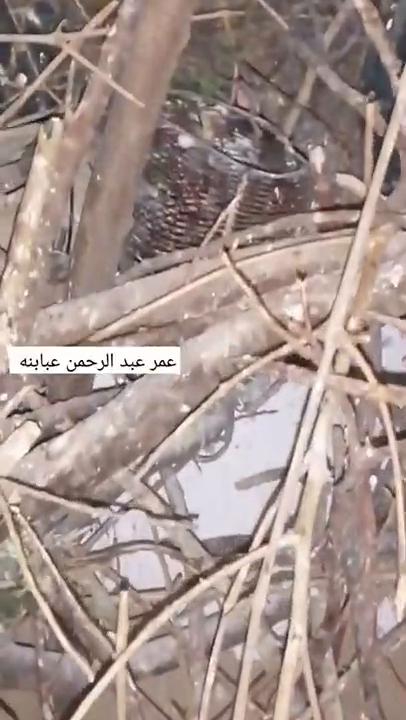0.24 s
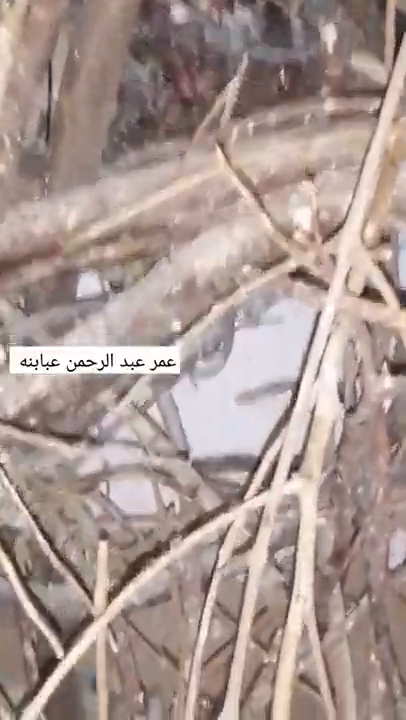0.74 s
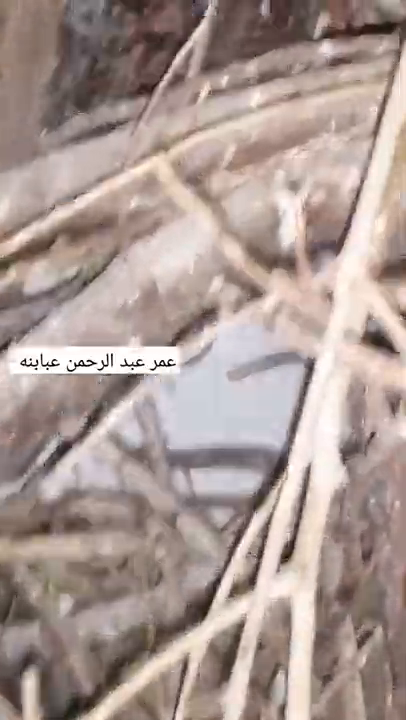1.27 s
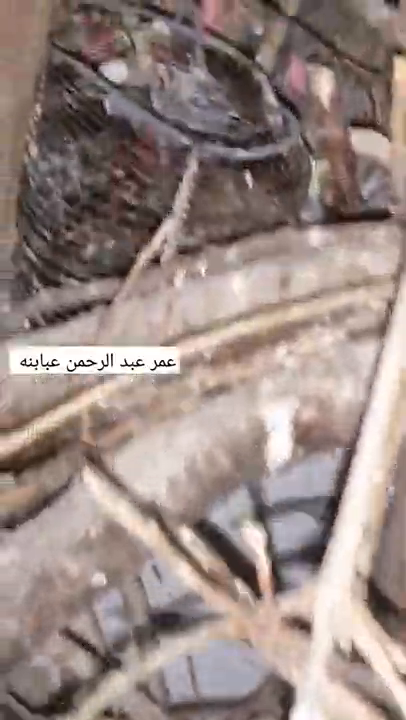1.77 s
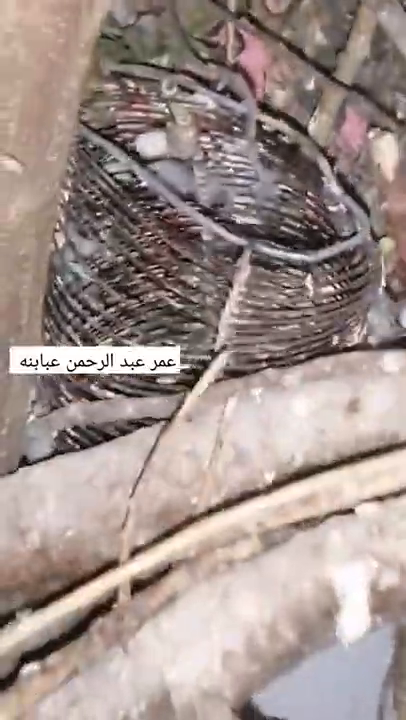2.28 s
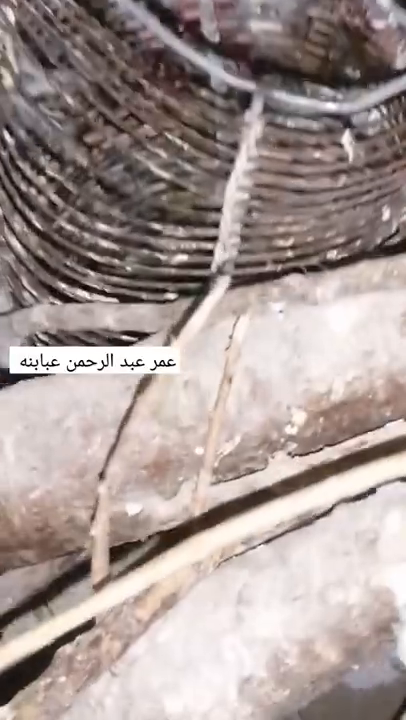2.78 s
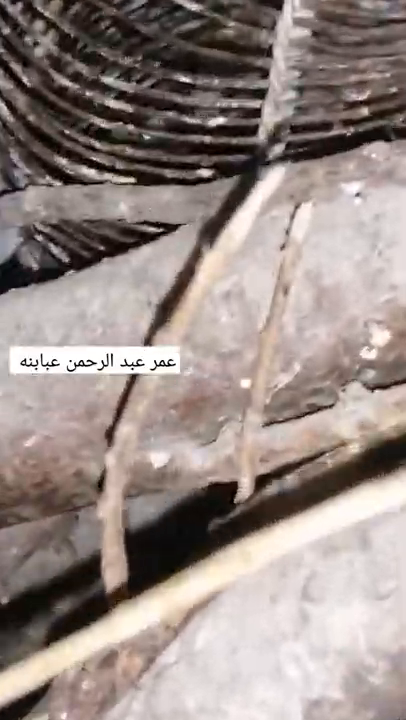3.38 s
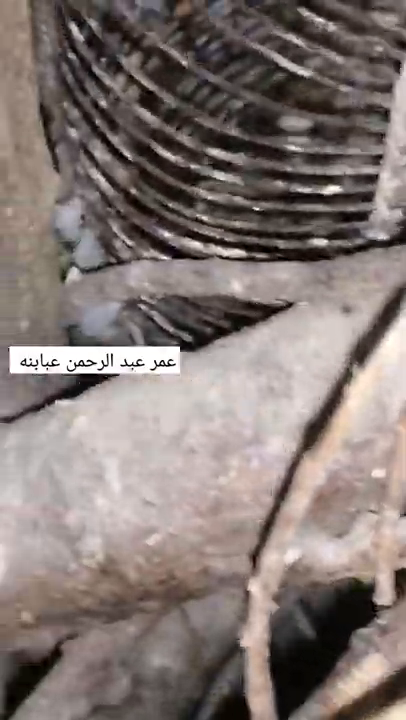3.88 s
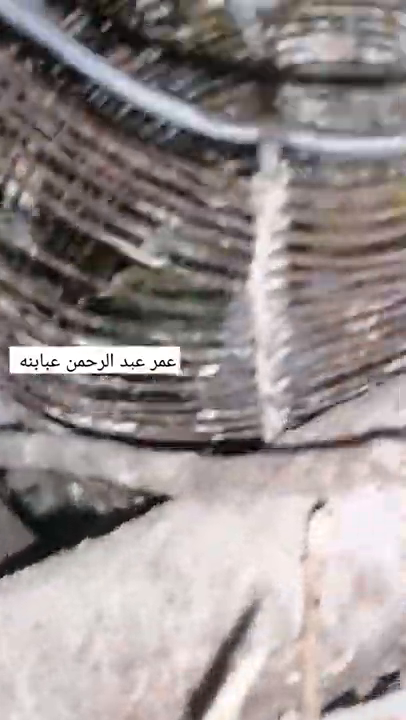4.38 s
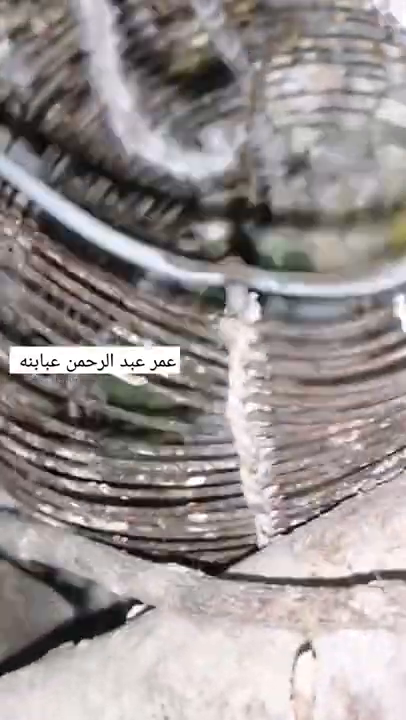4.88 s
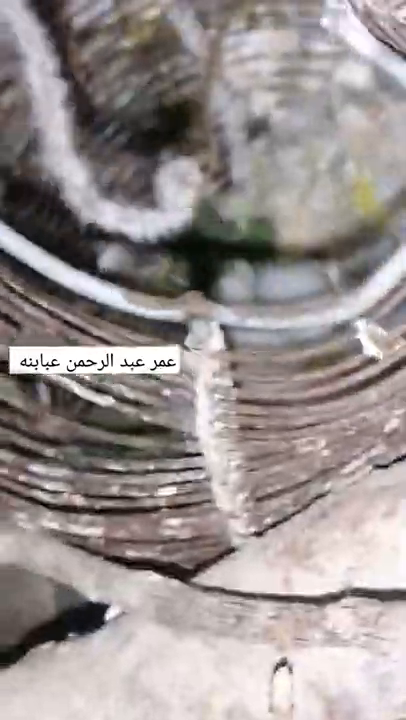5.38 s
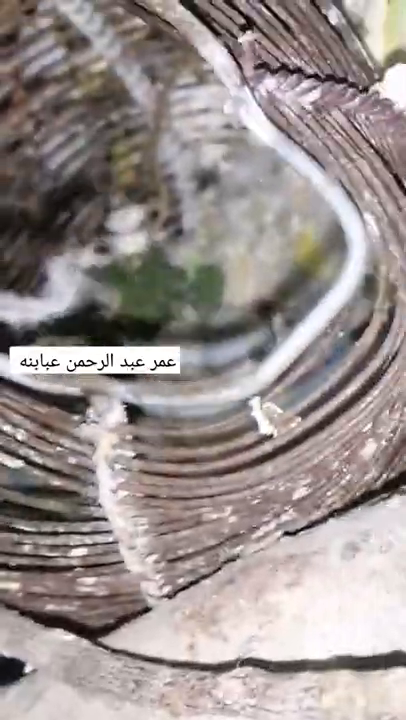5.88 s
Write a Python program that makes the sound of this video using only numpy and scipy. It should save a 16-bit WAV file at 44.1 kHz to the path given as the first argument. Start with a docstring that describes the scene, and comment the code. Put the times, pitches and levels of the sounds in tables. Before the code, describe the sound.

Zebra finches call in a small, hard-walled aviary. Near birds give harsh, buzzy rasps, quick arched squeaks and one clear double peep; birds behind chirp with sliding warbles over dense nasal chatter. A faint hum and distant engine rumble swell and fade under steady hiss. A handheld phone picks it up, brighter on the left and dull on the right, with two soft bumps.

```python
"""A tiny chirp and then harsh rasps come first: zebra finches in a small, hard-walled aviary, over a low rumble.
Near birds rasp (uneven pulses and rushing air through a beak), squeak (arched notes) and peep (clear whistles).
Birds further back chirp with sliding, warbling notes, and a flock of short nasal calls chatters behind them.
Hum, distant engine rumble, low noise and a drone swell and fade under a steady hiss; a hand bumps the phone twice.
The right microphone is shaded from the birds and hears them dull."""
import sys
import numpy as np
from scipy import signal
from scipy.fft import rfft, irfft, next_fast_len
from scipy.io import wavfile

SR = 44100
rng = np.random.default_rng(int(sys.argv[2]) if len(sys.argv) > 2 else 0)


def persist_wave(psi):
    """Save psi, clipped to +-1, as 16-bit WAV."""
    counts = np.round(np.clip(psi, -1, 1) * 32767).astype(np.int16)
    wavfile.write(sys.argv[1], SR, np.atleast_2d(counts).T)


N = 270774  # samples, about 6.1 s

# All levels in these tables are relative: each layer is balanced again when it is mixed.
# Chirps from further back: (start [s], length [s], level [dB], first pitch [Hz], last pitch [Hz])
FAR_CHIRPS = [(0, 0.0069, -31.5, 3650, 3600), (0.549, 0.1, -25.5, 3740, 3440),
              (0.789, 0.068, -31, 3480, 3650), (0.918, 0.017, -26.5, 3510, 3720),
              (.985, 0.059, -31, 3976, 3400), (1.183, 0.11, -34.5, 3300, 3635),
              (1.508, 0.045, -30, 3460, 2580), (1.575, 0.091, -29.5, 3215, 3880),
              (1.725, 0.13, -30, 3303, 3600), (2.043, 0.053, -34.5, 3280, 3150),
              (2.104, .09, -31.5, 3723, 2995), (2.439, 0.078, -29.5, 2990, 2770),
              (2.706, 0.046, -30, 4100, 4280), (2.75, 0.095, -31, 3280, 3490),
              (2.943, 0.067, -31, 3710, 3870), (3.074, 0.036, -29.5, 4140, 4110),
              (3.107, 0.073, -27, 2882, 2870), (3.143, 0.047, -25.5, 3810, 4050),
              (3.312, 0.084, -30, 3810, 3380), (3.495, 0.043, -32, 3840, 2870),
              (3.602, 0.071, -30, 3088, 3190), (3.688, 0.09, -30, 3160, 3010),
              (4.245, 0.0702, -25.5, 3410, 3100), (4.442, 0.044, -25.5, 3194, 3200),
              (4.483, 0.096, -26, 3730, 4110), (4.56, 0.045, -28, 3210, 3300),
              (5.119, 0.052, -35.5, 3760, 3430), (5.188, 0.076, -34, 3440, 2750),
              (5.385, .03, -32.5, 2930, 2840), (5.671, 0.035, -28, 3543, 3200),
              (5.7, .055, -25, 2913, 3470), (5.825, 0.13, -26.5, 3370, 3150),
              (6.042, .086, -28.5, 3550, 3400)]
# Tone of the distant flock: (frequency [Hz], gain [dB])
FLOCK_TONE = [(700, -7.5), (1100, -13.5), (1700, -6), (3200, 2.5), (4500, -6.5), (6500, -14), (9300, -7.5),
              (11500, -16), (15000, -18)]
# Loudness of the chatter over time: (time [s], level [dB])
CHATTER_LEVEL = [(0, 0), (.7, 3.5), (1.5, -3.5), (1.85, 2), (2.3, -2), (3.1, 4.5), (3.5, 1.5), (4.05, -0.5),
                 (4.5, 1.5), (5.3, -5), (6.14, 2)]
# Loudness of the hum and the distant engine rumble: (time [s], level [dB])
HUM_AND_ENGINE_LEVEL = [(0, -56), (.9, -53), (2.07, -49.5), (2.29, -62), (3.6, -55), (3.81, -43),
                        (4.14, -50.5), (4.62, -46.5), (5.2, -50.5), (6.14, -51)]
# Loudness of the low room noise: (time [s], level [dB])
ROOM_NOISE_LEVEL = [(0, -58.5), (1.1, -58.5), (2.05, -51.5), (3.1, -50.5), (3.6, -60), (4.45, -56),
                    (4.8, -48), (6.14, -54.5)]
# Loudness of a faint drone: (time [s], level [dB])
FAINT_DRONE_LEVEL = [(0, -65), (1.15, -65), (1.23, -50), (1.5, -66.5), (4.4, -80), (5.3, -49), (6.14, -57)]
# Tone of the distant engine rumble: (frequency [Hz], gain [dB])
ENGINE_TONE = [(20, -23), (32, -2), (42, 7), (62, 15.5), (76, -8), (100, -26), (200, -20), (1000, -48)]
# Tone of the low room noise: (frequency [Hz], gain [dB])
ROOM_NOISE_TONE = [(40, -13), (70, -22), (86, 3.5), (102, -8.5), (120, 2), (165, -4), (260, -11.5),
                   (400, -17), (700, -23.5), (2000, -41), (8000, -45)]
# Tone of the hiss: (frequency [Hz], gain [dB])
HISS_TONE = [(200, -22), (700, -9.5), (1400, 1), (3000, 9), (4500, 3), (7000, -3), (9500, 2), (11500, -15),
             (15000, -31)]
# Open-beak rasps: (start [s], length [s], level [dB], brightness [dB per octave], mouth resonance [Hz])
OPEN_RASPS = [(0.048, 0.094, -30, 3.5, 4440), (0.172, 0.15, -27, 4.5, 5800), (0.318, 0.28, -29, 5.5, 5800),
              (.433, 0.11, -18.5, 7.5, 6860), (0.654, 0.098, -18, 4.5, 4800), (.899, 0.62, -37, -3, 5200),
              (1.077, 0.17, -27, 5.5, 6000), (1.148, 0.12, -29, 3.5, 6540), (1.257, 0.11, -20, 4.5, 5350),
              (1.708, 0.23, -36.5, 5.5, 5430), (2.034, 0.034, -25.5, 4, 5260), (2.419, 0.026, -24, 1, 7200),
              (2.425, 0.094, -20, 3, 4900), (2.91, 0.39, -31, 2, 3500), (3.226, 0.15, -21, 4, 5450),
              (3.5, .053, -38.5, 3, 5300), (3.868, 0.057, -39.5, -1, 5900), (4.062, 0.034, -30, 4, 6150),
              (4.161, 0.041, -23.5, 3.5, 4570), (4.309, 0.081, -22.5, -1, 6140),
              (4.42, 0.092, -22.5, 6, 7400), (4.537, .11, -20, 5, 5950), (4.636, 0.14, -21, 5, 6300),
              (5.258, 0.017, -34.5, 9, 10000), (5.5, 0.23, -32.5, 0, 3700), (5.674, 0.29, -37.5, 1.5, 5350),
              (5.88, 0.06, -23.5, 4, 7530), (5.974, .13, -18.5, 5, 5700), (6.102, 0.078, -25, -2, 4400)]
# Nasal calls with the beak half shut: (start [s], level [dB], hollowness [0-1])
HALF_SHUT_CALLS = [(2.578, -24, 0.3), (4.704, -22, 0.8), (4.83, -18.5, 0.62), (4.935, -20.5, 0.63)]
# Throat with the beak wide open: (frequency [Hz], gain [dB])
OPEN_BEAK_TONE = [(500, -51), (1100, -23), (2000, -8.5), (2900, 5.5), (5500, 3), (7700, 1), (9400, 4),
                  (10500, -5), (12000, -15.5), (15000, -23.5)]
# Windpipe resonances with the beak nearly shut: (centre [Hz], half the filter width [Hz], gain [dB])
WINDPIPE_RESONANCES = [(4180, 840, 15), (9380, 630, 13), (13350, 890, 3.5)]
# Squeaks: (start [s], length [s], level [dB], first pitch [Hz], last pitch [Hz],
#           roughness [0-1], upper harmonics [dB])
SQUEAK_NOTES = [(0.204, 0.033, -28.5, 2910, 3020, 0.58, 1.5), (0.631, 0.042, -20.5, 4620, 5410, 0.45, -5),
                (0.641, 0.038, -28.5, 6140, 6300, 0.4, -10), (.667, .061, -16.5, 5350, 4660, .73, 2),
                (0.657, 0.07, -19, 3457, 3590, .32, -7), (1.732, 0.067, -29.5, 2720, 2734, 0.36, -7.5),
                (2, 0.0235, -40, 3790, 4580, 0.14, -11), (2.778, 0.031, -15.5, 4230, 4880, 0.5, -9),
                (2.786, 0.0633, -19, 2922, 3080, 0.35, -4.5), (2.926, 0.038, -35, 3270, 3320, 0, 2),
                (5.435, 0.034, -22, 4760, 5030, 0.63, -6), (5.45, .064, -16, 3282, 3170, 0.28, -24),
                (5.497, 0.048, -28, 4514, 4100, 0.25, -8)]
# How the throat favours some of a squeak's harmonics: (frequency [Hz], gain [dB])
SQUEAK_THROAT_TONE = [(2900, -11.5), (3400, -28), (4400, -3.5), (5200, -4.5), (6400, -0.5), (7500, -6),
                      (9100, 1.5), (10000, -8), (13500, -6.5), (15500, -30)]
# Clear peeps from a near bird: (start [s], length [s], level [dB])
CLEAR_PEEPS = [(1.364, 0.036, -21.5), (1.408, 0.027, -20)]
# Bumps on the phone: (time [s], thump level [dB], tick level before its filter [dB])
PHONE_BUMPS = [(3.206, -31.5, -3.5), (5.511, -30, -40)]
# Shading of the right microphone: (frequency [Hz], gain [dB])
RIGHT_SHADE = [(200, 4), (700, -2.5), (1300, -4), (2400, -7.5), (4400, -18), (6400, -18.5), (8500, -32.5),
               (11000, -29), (14500, -18.5)]

ROOM_T60_S = 0.46  # time for the lower part of the echo to fall by 60 dB
CUTOFF_HZ = 15600
HUM_HZ, HUM_WAVER_HZ = 59, 3.88
# A harsh call swells for a share of its length beyond CLUCK_S: at least ONSET_S,
# and at most SWELL_S or nine tenths of the call
CLUCK_S, ONSET_S, SWELL_S, SWELL_SHARE = 0.021, 0.003, 0.041, 0.56
NASAL_S = 0.073
SQUEAK_ARCH = 0.0181  # the middle lies this share above the average of both ends
PEEP_HZ, PEEP_FALL = 3364, 0.012  # first pitch, and the share by which it falls


def from_db(db):
    """Turn decibels into a plain multiplier."""
    return 10 ** (np.asarray(db) / 20)


def rms_one(x):
    """Scale a sound to an average (RMS) strength of 1."""
    return x / np.sqrt(np.mean(x ** 2) + 1e-20)


def level_over_time(curve):
    """Join (time, dB) points with straight lines and turn them into multipliers."""
    return from_db(np.interp(np.arange(N) / SR, *np.transpose(curve)))


def add(track, start_s, sound):
    """Mix a sound into a track, cut off at the track's end."""
    at = int(np.clip(start_s * SR, 0, N - 1))
    track[at:at + len(sound)] += sound[:N - at]


def coloured(x, tone, tilt_db=0):
    """Filter by a (Hz, dB) curve; the tilt, in dB per octave, acts above the curve's first point."""
    size = next_fast_len(x.shape[-1] + 512)
    octave = np.log2(np.arange(size // 2 + 1) * SR / size + 1)
    hz, db = np.transpose(tone)
    octaves_above = np.maximum(octave - np.log2(hz[0]), 0)
    gain_db = np.interp(octave, np.log2(hz), db) + tilt_db * octaves_above
    return irfft(rfft(x, size) * from_db(gain_db), size)[..., :x.shape[-1]]


def wobble(size, rate):
    """Wander at random between new values drawn `rate` times a second, with a spread near 1."""
    knots = np.arange(size) * rate / SR
    return np.interp(knots, np.arange(size), rng.standard_normal(size))


def resonate(x, hz, width_hz):
    """Ring at one frequency, with gain 1 at the peak."""
    r = np.exp(-np.pi * width_hz / SR)
    feed = np.array([1, 0, -1]) * (1 - r * r) / 2
    return signal.lfilter(feed, [1, -2 * r * np.cos(2 * np.pi * hz / SR), r * r], x)


def low_pair(side_db):
    """White noise partly shared by both microphones; side_db sets the part that differs."""
    mid, side = rng.standard_normal((2, N))
    return mid + from_db(side_db) * side * [[1], [-1]]


def room(x, wet_db, damping, right_direct=0.51):
    """Direct sound and a dense echo tail, different at each microphone; the treble dies sooner."""
    t = np.arange(SR) / SR
    low_filter = signal.butter(2, 6000, "low", fs=SR, output="sos")
    high_filter = signal.butter(2, 6000, "high", fs=SR, output="sos")
    low = signal.sosfilt(low_filter, rng.standard_normal((2, SR)))
    high = signal.sosfilt(high_filter, rng.standard_normal((2, SR)))
    tail = low * from_db(-60 * t / ROOM_T60_S) + high * from_db(-60 * t * damping / ROOM_T60_S)
    response = from_db(wet_db) * tail / np.sqrt(np.sum(tail ** 2, axis=1, keepdims=True))
    response[:, 0] += [1, right_direct]
    heard = signal.fftconvolve(x[None], response, axes=1)[:, :N]
    return heard / np.sqrt(1 + from_db(wet_db) ** 2)  # more echo does not make it louder overall


def syrinx(length, pitches, rough, harmonics_db, jitter, jitter_rate, warble, warble_rate):
    """A gliding note from a bird's voice organ; roughness shakes its pitch and makes its strength flutter."""
    size = int(max(length, 0.005) * SR)
    progress = np.linspace(0, 1, size)
    glide = np.polyfit(np.linspace(0, 1, len(pitches)), pitches, len(pitches) - 1)
    hz = np.polyval(glide, progress)
    unrest = jitter * wobble(size, jitter_rate) + warble * wobble(size, warble_rate)
    phase = 2 * np.pi * np.cumsum(hz * (1 + rough * unrest)) / SR
    tone = sum(from_db(db) * np.sin(k * phase)
               for k, db in enumerate(harmonics_db, 1) if k * max(pitches) < SR / 2)
    flutter = rms_one(1 + np.tanh(2 * rough * wobble(size, jitter_rate)))
    return np.sqrt(2) * tone * signal.windows.tukey(size, 0.5) * flutter


def chirp(length, first_hz, last_hz, rough, second_db=-17, third_db=-22):
    """A nearly pure note that slides and warbles, with two weaker harmonics."""
    return syrinx(length, [first_hz, last_hz], rough, [0, second_db, third_db],
                  jitter=0.057, jitter_rate=800, warble=0.0777, warble_rate=160)


def chirps(rough_per_s=6.84):
    """The louder birds on the back perches; the longer a chirp lasts, the more it warbles."""
    out = np.zeros(N)
    for start, length, level_db, first, last in FAR_CHIRPS:
        add(out, start, from_db(level_db) * chirp(length, first, last, rough_per_s * length))
    return out


def rumble(hum_db=-4, second_db=-10, third_db=-10, engine_db=-3,
           drone_hz=390, drone_width_hz=60, drone_db=-2):
    """A wavering hum with harmonics, and filtered noise for the engine, the room and a faint drone."""
    phase = 2 * np.pi * np.cumsum(HUM_HZ + HUM_WAVER_HZ * wobble(N, 12)) / SR
    hum = rms_one(sum(from_db(db) * np.sin(k * phase)
                      for k, db in enumerate([0, second_db, third_db], 1)))
    engine = rms_one(coloured(low_pair(-13), ENGINE_TONE))
    room_noise = rms_one(coloured(low_pair(-11), ROOM_NOISE_TONE))
    drone = rms_one(resonate(low_pair(-1.1), drone_hz, drone_width_hz))
    deep = from_db(hum_db) * hum + from_db(engine_db) * engine
    return (level_over_time(HUM_AND_ENGINE_LEVEL) * deep
            + level_over_time(ROOM_NOISE_LEVEL) * room_noise
            + level_over_time(FAINT_DRONE_LEVEL) * from_db(drone_db) * drone)


def hiss(level_db=-44):
    """Steady filtered noise, separate at each microphone."""
    return from_db(level_db) * rms_one(coloured(rng.standard_normal((2, N)), HISS_TONE))


def flock(count=170, low_hz=900, high_hz=2200, glide=0.25, spread_db=7, level_db=-41):
    """Many short nasal calls, rich in harmonics, run together on the far perches."""
    out = np.zeros(N)
    slot_s = N / SR / count  # one call starts at random in each slot
    for k, (when, pitch, slide, loud) in enumerate(rng.random((count, 4))):
        hz = low_hz + pitch * (high_hz - low_hz)
        last_hz = hz * (1 + glide * (2 * slide - 1))
        note = syrinx(0.04, [hz, last_hz], 0.383, np.zeros(10),
                      jitter=0.075, jitter_rate=900, warble=0.0799, warble_rate=101.8)
        add(out, (k + when) * slot_s, from_db(spread_db * loud) * note)
    return from_db(level_db) * rms_one(coloured(out, FLOCK_TONE))


def harsh_call(length, bright_db, mouth_hz, hollow=0, pulse_hz=800, jitter=0.03, slide=0.12, air=0.95,
               flutter_db=5.0, edge_db=-15, mouth_gain=0.77, mouth_width_hz=900):
    """Uneven voice pulses and rushing air, shaped by the open beak or ringing in the windpipe."""
    size = int(length * SR)
    unrest = jitter * wobble(size, 500) + slide * wobble(size, 45)
    cycles = np.cumsum(pulse_hz * np.exp(unrest)) / SR
    pulses = np.diff(np.floor(cycles), prepend=0)  # one click per finished cycle
    source = rms_one(pulses - pulses.mean()) + air * rng.standard_normal(size)
    wide = coloured(source, OPEN_BEAK_TONE, bright_db)
    wide = rms_one(wide + mouth_gain * resonate(wide, mouth_hz, mouth_width_hz))
    piped = sum(from_db(db) * resonate(resonate(source, hz, 2 * half_width), hz, 2 * half_width)
                for hz, half_width, db in WINDPIPE_RESONANCES)
    hollow = np.clip(hollow, 0, 1)
    voice = np.sqrt(1 - hollow) * wide + np.sqrt(hollow) * rms_one(piped)
    swell = np.clip(SWELL_SHARE * (length - CLUCK_S), ONSET_S, min(SWELL_S, 0.9 * length))
    # a rounded push of air: quiet at both ends, strongest after the swell
    from_peak = np.interp(np.arange(size) / SR, [0, swell, length], [1, 0, 1])
    effort_db = edge_db * from_peak ** 2
    return rms_one(voice) * from_db(effort_db + flutter_db * np.tanh(wobble(size, 272)))


def rasps(nasal_bright_db=4, nasal_mouth_hz=8600):
    """The near birds' harsh calls: open beaks rasp, half-shut beaks sound hollow and nasal."""
    out = np.zeros(N)
    for start, length, level_db, bright_db, mouth_hz in OPEN_RASPS:
        add(out, start, from_db(level_db) * harsh_call(length, bright_db, mouth_hz))
    for start, level_db, hollow in HALF_SHUT_CALLS:
        call = harsh_call(NASAL_S, nasal_bright_db, nasal_mouth_hz, hollow)
        add(out, start, from_db(level_db) * call)
    return out


def soft_rasps(count=26, length_s=0.05, softest_db=-47, spread_db=5, bright_db=0, mouth_hz=5700):
    """Quiet contact calls, harsh but soft, scattered through the whole scene."""
    out = np.zeros(N)
    slot_s = N / SR / count
    for k, (when, loud) in enumerate(rng.random((count, 2))):
        call = harsh_call(length_s, bright_db, mouth_hz)
        add(out, (k + when) * slot_s, from_db(softest_db + spread_db * loud) * call)
    return out


def soft_chirps(count=32, length_s=0.048, low_hz=2800, high_hz=4100, fall=0.22, rough=0.161,
                softest_db=-39, spread_db=5):
    """Soft falling notes from more birds further back, at random times and pitches."""
    out = np.zeros(N)
    slot_s = N / SR / count
    for k, (when, pitch, slide, loud) in enumerate(rng.random((count, 4))):
        hz = low_hz + pitch * (high_hz - low_hz)
        note = chirp(length_s, hz, hz * (1 - fall * slide), rough, second_db=-7, third_db=-14.5)
        add(out, (k + when) * slot_s, from_db(softest_db + spread_db * loud) * note)
    return out


def squeaks():
    """Arched notes whose harmonics are loud where they meet the throat's resonances."""
    out = np.zeros(N)
    for start, length, level_db, first, last, rough, upper_db in SQUEAK_NOTES:
        middle = (first + last) / 2 * (1 + SQUEAK_ARCH)
        harmonics_db = [0, 0, upper_db, upper_db - 3.5]
        note = syrinx(length, [first, middle, last], rough, harmonics_db,
                      jitter=0.048, jitter_rate=1300, warble=0.0385, warble_rate=182.4)
        add(out, start, from_db(level_db) * note)
    return coloured(out, SQUEAK_THROAT_TONE)


def peeps(rough=0.16):
    """A clear double whistle: two nearly pure notes at the same, barely falling pitch."""
    out = np.zeros(N)
    last_hz = PEEP_HZ * (1 - PEEP_FALL)
    for start, length, level_db in CLEAR_PEEPS:
        note = chirp(length, PEEP_HZ, last_hz, rough, second_db=-24, third_db=-34)
        add(out, start, from_db(level_db) * note)
    return out


def bumps(thump_hz=180, width_hz=150, thump_decay_s=0.0007,
          tick_decay_s=0.0008, tick_hz=8800, tick_width_hz=3500):
    """A finger knocks the case: a push rings as a dull thump, and a noise burst makes a tiny tick."""
    out = np.zeros(N)
    t = np.arange(SR // 10) / SR
    for start, thump_db, tick_db in PHONE_BUMPS:
        thump = resonate(t * np.exp(-t / thump_decay_s), thump_hz, width_hz)
        thump = thump / np.abs(thump).max()
        burst = rng.standard_normal(len(t)) * np.exp(-t / tick_decay_s)
        tick = resonate(burst, tick_hz, tick_width_hz)
        add(out, start, from_db(thump_db) * thump + from_db(tick_db) * tick)
    return out


def scene():
    """Near and far birds in the room, heard mostly on the left; all but the rumble is shaded on the right."""
    chatter = level_over_time(CHATTER_LEVEL)
    near_calls = from_db(0.97) * rasps() + chatter * soft_rasps() + from_db(3.0) * squeaks()
    near = room(near_calls, wet_db=2.0, damping=1.72)
    nearest = room(peeps(), wet_db=-3, damping=1.7)
    far_calls = chirps() + chatter * (soft_chirps() + flock())
    far = room(far_calls, wet_db=5.0, damping=3.15)
    left, right = nearest + near + far + hiss() + bumps()
    return np.array([left, coloured(right, RIGHT_SHADE)]) + rumble()


def record(dry):
    """Cut the top steeply with a low-pass filter."""
    low_pass = signal.ellip(10, 0.2, 80, CUTOFF_HZ, fs=SR, output="sos")
    return signal.sosfilt(low_pass, dry)


dry = scene()
out = record(dry)
persist_wave(out)
```